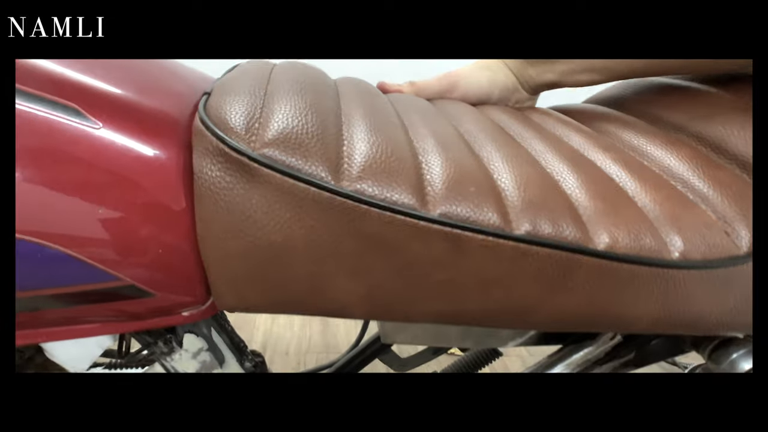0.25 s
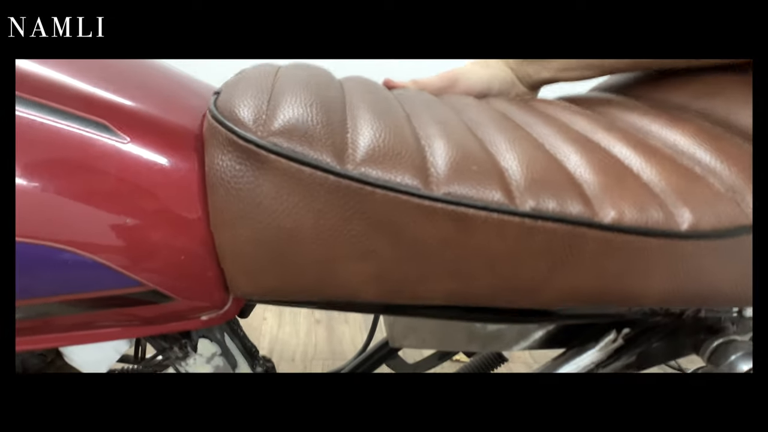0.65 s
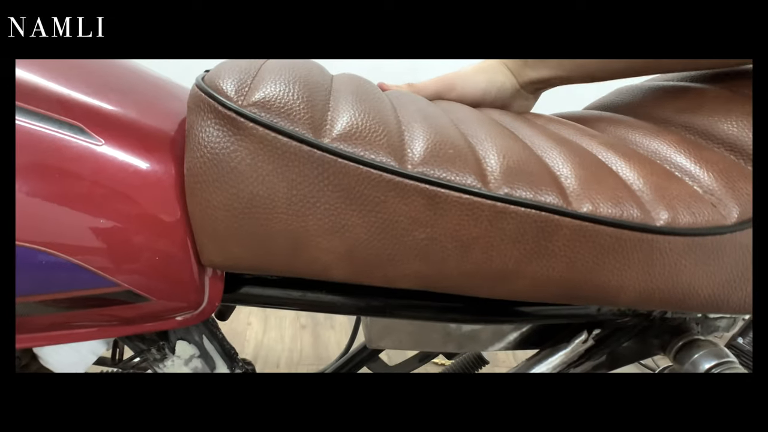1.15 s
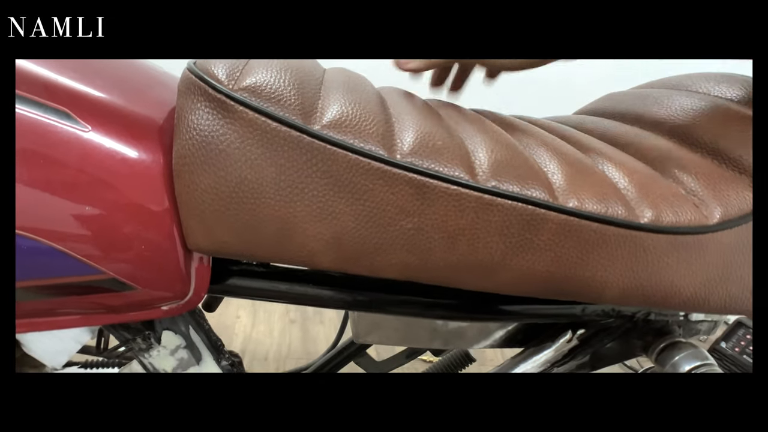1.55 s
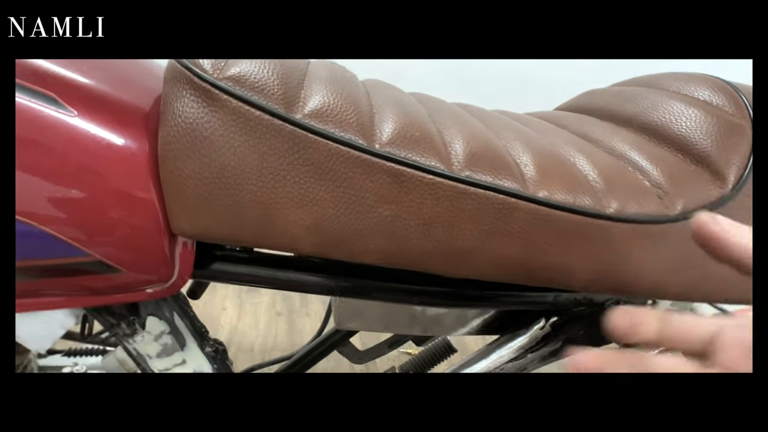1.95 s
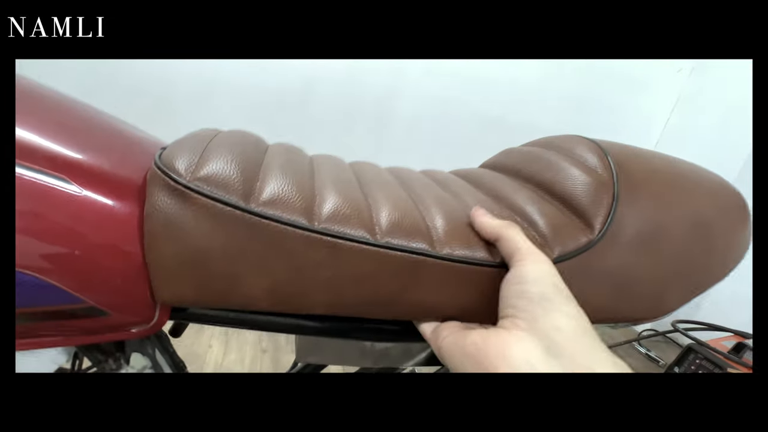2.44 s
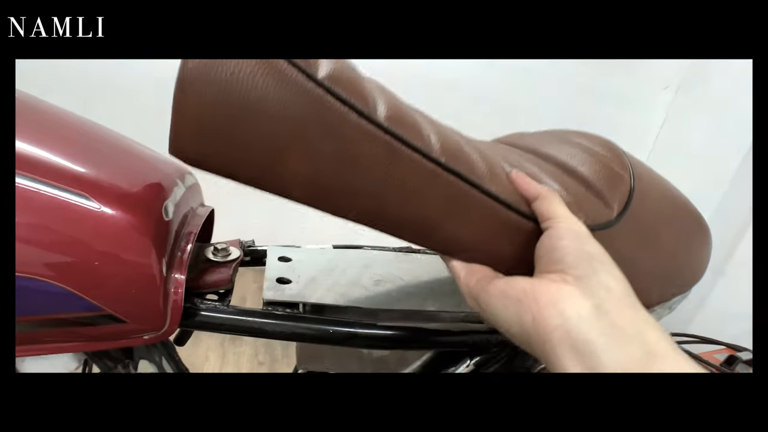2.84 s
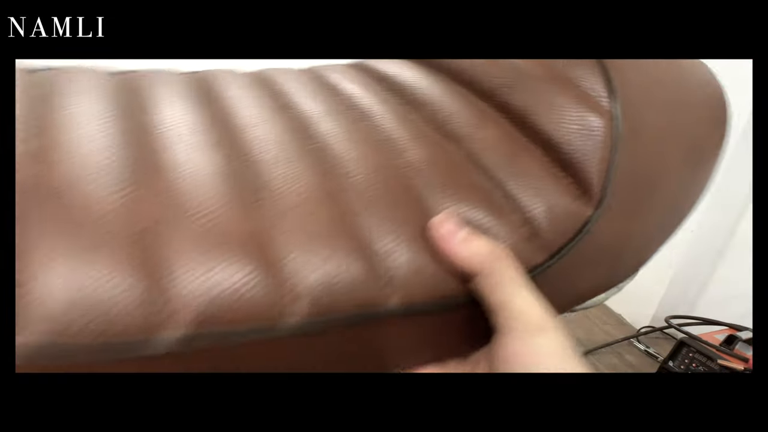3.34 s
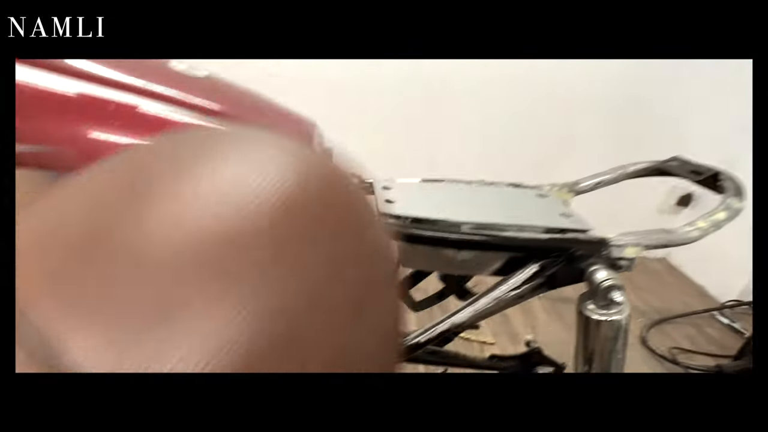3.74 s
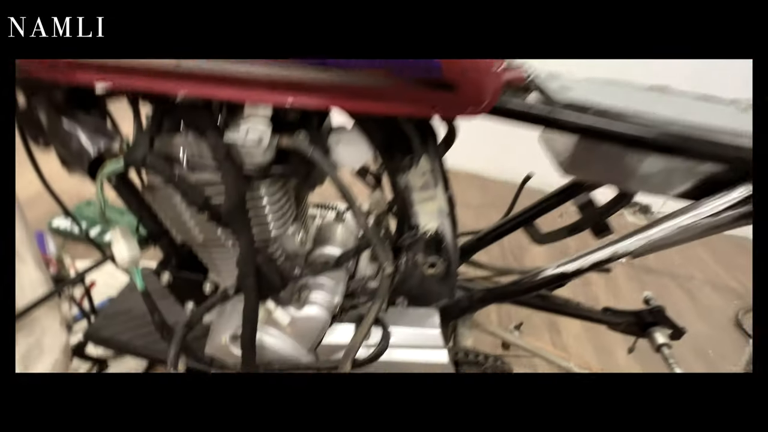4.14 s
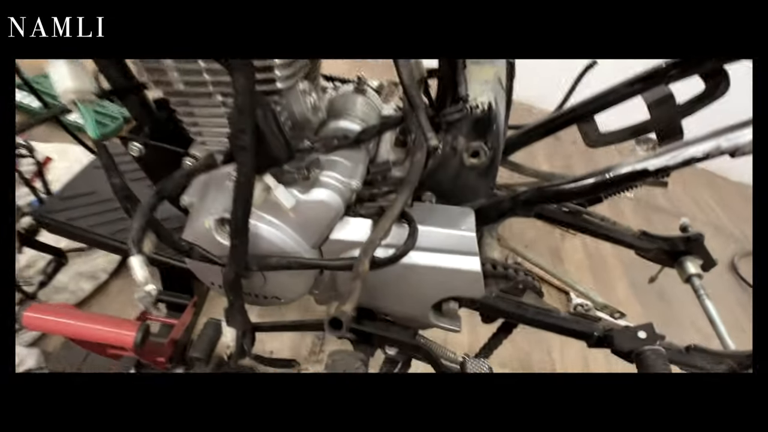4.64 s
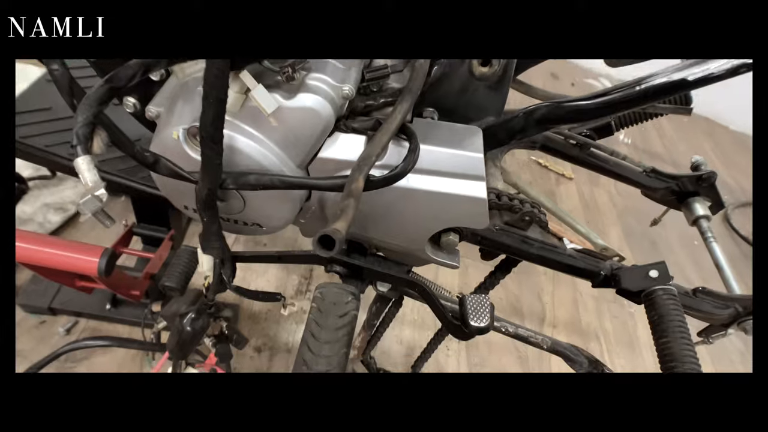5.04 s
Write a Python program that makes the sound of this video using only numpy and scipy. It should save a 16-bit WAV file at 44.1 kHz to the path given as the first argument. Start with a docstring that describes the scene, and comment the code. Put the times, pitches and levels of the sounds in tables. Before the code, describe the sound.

A motorcycle seat is handled close to a small, slightly coloured microphone in a bare, reverberant workshop. From about 0.15 s it is rocked: low hollow thuds of the seat pan, a heavy one near 0.38 s, then a crowded rattle of plastic clacks and metal knocks from 0.6 to 0.8 s, with scraping and short squeaks. Single knocks follow near 0.92, 0.98 and 1.26 s, their echoes fading. It stays quiet until about 2 s, when light touches and rubbing begin, building to knocks and tiny creaks at 2.4 and 2.6 s and a sharp, loud clack at 2.67 s as the seat comes free. The echo dies into room air, fluctuating low rumble and faint rubbing around 3.2-3.6 s. A distant motor hum grows slightly clearer after 4 s. From 4.77 s tools tick and clunk, with a small faint creak, then a duller clatter at 5.08-5.2 s.

```python
"""A padded motorcycle seat, close to the microphone, is rocked, unhooked and lifted off its steel frame.
Bursts of contact ring the seat pan, shell, brackets and steel as thuds, knocks and ticks; tools clatter
at the end. Random slips through the same parts scrape, and narrow resonances squeak. Sparse echoes fill
the bare workshop; a distant motor hums as sines over noise, the air of the room, and a low rumble.
A small microphone colours it all and overloads softly on the hardest peaks."""
import sys
import numpy as np
from scipy import signal
from scipy.io import wavfile
from scipy.ndimage import uniform_filter1d

SR = 44100
rng = np.random.default_rng(int(sys.argv[2]) if len(sys.argv) > 2 else 0)


def generate_wav(signal):
    """Clip the signal to [-1, 1] and save it as 16-bit WAV at the path in sys.argv[1]."""
    frames = np.transpose(np.atleast_2d(signal))
    scaled = np.clip(frames, -1, 1) * 32767
    pcm = np.round(scaled).astype(np.int16)
    wavfile.write(sys.argv[1], SR, pcm)


N = 233244

# ringing modes of each part: (frequency [Hz], relative level [dB], t60 [s])
PAN_MODES = [(115, -7.5, 0.051), (194, -4.5, 0.036), (257.2, -0.5, 0.093), (293, 3, 0.042),
             (403, -0.5, 0.042), (497, -2.5, 0.053), (608.4, -2, 0.039)]
SHELL_MODES = [(702, -16, 0.035), (921, 4, 0.012), (964, 5, 0.011), (1390, 3, 0.0043)]
BRACKET_MODES = [(1642, 7.5, 0.019), (1940, 10.5, 0.0072), (2245, 9, 0.013), (2575, 5.5, 0.011),
                 (2850, 4, 0.016), (3136, 10.5, 0.0054)]
STEEL_MODES = [(3783, 14, 0.0065), (4410, 9.5, 0.005), (4995, 5.5, 0.011), (5434, 1.5, 0.017),
               (5850, 6.5, 0.0086), (6340, 4, 0.012), (6834, 0, 0.023), (7380, 3, 0.013)]
TICK_MODES = [(7900, 0, .004), (8800, 0, .004), (9700, -1, .004), (10600, -2, .004), (11600, -3, .0035),
              (12700, -5, .003), (13900, -7, .003), (15100, -9, .003)]
BODIES = (PAN_MODES, SHELL_MODES, BRACKET_MODES, STEEL_MODES, TICK_MODES)
# pitch of shell, bracket, steel and tick against the bracket: (pitch [octaves])
OCTAVES = np.array([-1.2, 0, 1.25, 2.2])


def amp(db):
    """Decibels to gain."""
    return 10 ** (np.asarray(db) / 20)


def evened(x):
    """Scaled to rms 1."""
    return x / np.sqrt(np.mean(x ** 2) + 1e-20)


def read(points, hz):
    """Table value at a frequency, straight lines on a log axis."""
    f, value = np.transpose(points)
    return np.interp(np.log(hz + 1), np.log(f + 1), value)


def add(mix, s, sound):
    """Mixes a sound in at a time in seconds."""
    part = mix[round(s * SR):][:len(sound)]
    part += sound[:len(part)]


def air():
    """Room air: steady coloured noise with faint drifting patches in time and frequency."""
    # colour of the air: (frequency [Hz], relative density [dB per Hz])
    air_colour = [(30, -43.5), (60, -5), (160, -5), (400, -8.5), (1000, -12.5), (2500, -17), (5000, -30),
                  (8000, -35), (9200, -43.5), (10100, -36), (11000, -45.5), (13000, -48), (16000, -55.5)]
    level_db = -40  # rms ahead of the microphone
    frames, hz = N // 256 + 5, np.fft.rfftfreq(1024, 1 / SR)
    real, imag, patches = rng.standard_normal((frames, 513, 3)).T
    patches = uniform_filter1d(patches, size=10, axis=0)
    patches = evened(uniform_filter1d(patches, size=16, axis=1))
    spectrum = (real + 1j * imag) * amp(read(air_colour, hz)[:, None] + 0.64 * patches)
    noise = signal.istft(spectrum, nperseg=1024, noverlap=768)[1][:N]
    return amp(level_db) * evened(noise)


def wander(t, low_hz, high_hz, count):
    """Slow irregular movement of rms 1: a sum of sines with random phases."""
    rates = np.geomspace(low_hz, high_hz, num=count)
    return evened(sum(np.sin(2 * np.pi * (f * t + rng.random())) for f in rates))


def low_rumble():
    """Low rumble near 75 Hz, swelling at random: a sine wandering in pitch and strength."""
    # level of the rumble: (time [s], level [dB])
    rumble_level = [(0.0, -42), (0.35, -57), (0.43, -38), (0.5, -45), (0.53, -50), (0.97, -40), (1.05, -57),
                    (1.75, -40), (1.91, -52), (2.65, -41.5), (2.99, -57), (3.67, -41), (3.7, -50.5),
                    (4.3, -47), (4.45, -63), (4.52, -38), (4.62, -51.5), (5.29, -46.5)]
    centre_hz, drift_hz, swell_db = 75.4, 3.38, 1.5  # drift and swell are rms
    t = np.arange(N) / SR
    drift = wander(t, 0.5, 5, 12)
    swell = wander(t, 2.5, 7.7, 12)
    phase = 2 * np.pi * np.cumsum(centre_hz + drift_hz * drift) / SR
    rumble = evened(amp(swell_db * swell) * np.sin(phase))
    return amp(np.interp(t, *np.transpose(rumble_level))) * rumble


def hum():
    """Distant motor: each order is a sine that wavers slightly in strength."""
    # motor orders ahead of waver and swell: (frequency [Hz], rms level [dB])
    orders = [(145, -57.5), (161.5, -55.5), (323, -48.5), (565.2, -59.5)]
    # the motor is heard more or less as the microphone turns: (time [s], gain [dB])
    swell = [(0, 10), (1, -2), (2, -1.5), (3, -1.5), (3.7, -1), (4.1, 6.5), (4.5, 5.5), (4.8, 7),
             (5.29, 5.5)]
    t = np.arange(N) / SR
    motor = 0
    for hz, db in orders:
        gain = np.sqrt(2) * amp(db + wander(t, 1.5, 6, 6))
        motor = motor + gain * np.sin(2 * np.pi * (hz * t + rng.random()))
    return motor * amp(np.interp(t, *np.transpose(swell)))


def room(x):
    """Workshop walls: sparse echoes of random sign, each band dying at its own speed."""
    # decay of the room: (frequency [Hz], t60 [s])
    decay_times = [(120, 0.44), (330, 1.4), (870, 1.1), (2300, 0.98), (6000, 0.87), (10000, 0.59),
                   (15000, 0.29)]
    # strength of the echoes: (frequency [Hz], level [dB])
    echo_strength = [(120, -7.5), (400, -5.5), (1200, -2), (5000, -4), (10000, -1.5), (15000, 0)]
    spacing = 12  # samples; one echo falls at random in each slot
    taps = np.zeros(SR + SR // 2)
    at = np.arange(200, len(taps) - spacing, spacing)
    taps[at + rng.integers(0, spacing, len(at))] = rng.choice([-1., 1.], len(at))
    hz, t, bands = signal.stft(taps, SR, nperseg=256)
    decay = amp(-60 * t / read(decay_times, hz)[:, None])
    # equal energy in every band, then the echo strength
    decay *= amp(read(echo_strength, hz))[:, None] / np.linalg.norm(decay, axis=1, keepdims=True)
    tail = signal.istft(bands * decay, SR, nperseg=256)[1] * np.sqrt(spacing / 128)
    return signal.fftconvolve(x, tail)[:N]


def squeak(hz, width, db, length):
    """Rubbed part: a steady tone joined by noise held in one narrow resonance."""
    t = np.arange(0, length, 1 / SR)
    pole = np.exp(-np.pi * width / SR)
    # 12000 samples let the resonance settle; only the end is used
    drift = signal.lfilter([1], [1, -pole], rng.standard_normal((2, 12000)))[:, -len(t):]
    envelope = 1.5 * drift.std() + drift[0] + 1j * drift[1]
    tone = (envelope * np.exp(2j * np.pi * hz * t)).real
    attack = np.minimum(t / .004, 1)
    release = np.minimum((length - t) / (.6 * length), 1)
    return amp(db) * evened(tone) * attack * release


def ring(modes, spread_db, detune):
    """One tap on a body; where it lands shifts the strength and pitch of each mode."""
    hz, db, t60 = np.transpose(modes)[:, :, None]
    place = rng.standard_normal((2, len(modes), 1))
    t = np.arange(6000) / SR
    sign = (-1) ** np.arange(len(modes))[:, None]  # neighbouring modes swing in opposite senses
    waves = sign * np.sin(2 * np.pi * hz * (1 + detune * place[0]) * t)
    return (amp(db + spread_db * place[1] - 60 * t / t60) * waves).sum(0)


def slide(rows):
    """Stick-slip: dense grains of uneven size run through the parts; returns start time and sound."""
    # how readily shell, bracket, steel and tick answer rubbing: (gain [dB])
    rub_db = np.array([-2.0, 1.5, -1.5, -6.5])
    slip_rate = 2500  # mean slips per second
    s, rumble_db, pressure_db, sharpness = np.transpose(rows)
    levels_db = [rumble_db, *(pressure_db + rub_db[:, None] + sharpness * OCTAVES[:, None])]
    t = np.arange(s[0], s[-1], 1 / SR)
    out = 0
    for modes, db in zip(BODIES, levels_db):
        size = amp(3.5 * np.minimum(rng.exponential(1, len(t)), 4))
        slips = size * (rng.random(len(t)) < slip_rate / SR)
        slips *= rng.choice([-1., 1.], len(t))
        scrape = signal.fftconvolve(slips, ring(modes, 0, 0))[:len(t)]
        out = out + amp(np.interp(t, s, db)) * evened(scrape)
    return s[0], out * signal.windows.tukey(len(t), .02)


def blow(thud_db, clack_db, knock_db, sharpness, length):
    """Contacts build up to a hard one and chatter away; returns the near sound and what fills the room."""
    # how readily bracket, steel and tick answer a knock: (gain [dB])
    knock_answer_db = np.array([.3, .7, -1.5])
    hard_edge = 3.27  # main contact, against a chatter of 0.49
    t = np.arange(4000) / SR
    rise = np.clip(length ** 2 / 0.016, .0001, .03)  # [s] long chatters build up slowly
    # sharp contact favours the high parts
    levels_db = [thud_db, clack_db, *(knock_db + knock_answer_db + sharpness * OCTAVES[1:])]
    uneven = evened(uniform_filter1d(rng.standard_normal(4000), size=40))
    contacts = 0.49 * rng.standard_normal(4000) * amp(2.0 * uneven)
    contacts *= np.minimum(t / rise, 1) ** 2 * np.exp(-np.maximum(t - rise, 0) / max(length, .0003))
    contacts[round(rise * SR)] = hard_edge * np.exp(-rise / 0.0009)  # a slow build-up softens the edge
    near = spread = 0
    for body, db in zip(BODIES, levels_db):
        sound = signal.fftconvolve(contacts, ring(body, 1.0, .01))
        loudest = np.sqrt(uniform_filter1d(sound ** 2, size=256).max())  # short-time rms
        sound = amp(db) * sound / loudest
        even = ring(body, 0, 0)  # summed over all directions the colour is smooth
        near = near + sound
        spread = spread + even * np.linalg.norm(sound) / np.linalg.norm(even)
    return near, spread


def scene():
    """Blows, slides and squeaks with their echoes, over air, low rumble and hum."""
    # blows: (time [s], seat pan thud [dB], plastic shell clack [dB], metal knock [dB],
    #         sharpness [dB per octave], chatter length [s])
    blows = [(0.153, -22, -33, -39, -0.5, 0.0031), (0.161, -20, -31, -36, -4.5, 0.01),
             (0.178, -26, -27.5, -38, -1.5, 0.0046), (0.19, -16, -22.5, -35, -5, 0.0066),
             (0.331, -31, -50, -50, 8, 0.0023), (0.363, -18.5, -21.5, -50, -16, 0.012),
             (0.376, -8.5, -22, -28.5, -18, 0.0044), (.394, -13.5, -18.5, -34, -2, 0.0053),
             (0.41, -19, -42, -27.5, -4.5, 0.0059), (0.479, -35, -45, -48, 3, 0.0021),
             (.586, -30, -34, -28.5, -1, 0.0033), (0.591, -35.5, -38, -30, -1.5, 0.0054),
             (0.599, -14, -24, -27.5, 1, 0.014), (.615, -14.5, -14.5, -27, -3.5, 0.011),
             (0.628, -18, -21, -20, -3, 0.0082), (.649, -33, -19, -20, -7, .004),
             (0.679, -18, -25, -23.5, -1, 0.0059), (0.708, -10, -15.5, -21, -4.5, 0.0031),
             (0.724, -39.5, -19.5, -27, -5.5, .008), (0.735, -11, -18, -11, 2, .0047),
             (0.744, -17, -21.5, -18, 4, .007), (0.753, -25, -19, -10, 0.4, .008),
             (0.77, -45, -30, -20, -2, .007), (0.781, -24, -28.5, -37, -1, .009),
             (.924, -21.5, -18, -20, -2, 0.0036), (.984, -27, -20.5, -20, -3, 0.0032),
             (1.2557, -26, -19, -19.5, -1, 0.0027), (1.259, -18.5, -27, -23, -2, .0037),
             (1.294, -32.5, -25.5, -30, -6, 0.0046), (1.691, -37.5, -40, -55.5, 5, 0.0049),
             (2.004, -40, -47.5, -26, -14, 0.0055), (2.085, -40, -55, -43, -1, 0.014),
             (2.2193, -26, -17, -26, -0.5, .0021), (2.239, -32, -38, -29.5, -2, .008),
             (2.313, -25, -33, -26.5, -2.5, 0.0037), (2.383, -47, -19, -32, -9, .0018),
             (2.399, -30, -29, -22.5, -5.5, 0.0074), (2.42, -30, -37, -30, -6, .008),
             (2.426, -17.5, -24.5, -20.5, -5, 0.0057), (2.516, -33, -51, -31, -2.5, 0.0032),
             (2.594, -16, -61, -30, -2.5, 0.0058), (2.599, -24.5, -31, -33, -8, .011),
             (2.615, -24, -26, -26, -1, .0098), (2.6744, -15.5, -10, -9.5, 0, 0.0023),
             (4.7672, -53, -46, -27, -6.5, 0.0012), (4.818, -21, -29, -31, 1.5, 0.0042),
             (5.036, -48, -53, -46, 7, 0.0046), (5.084, -53, -25.5, -28.5, -11, 0.0049),
             (5.091, -47, -22, -28, -15, 0.0052), (5.156, -21, -18.5, -20.5, -8.5, 0.0091),
             (5.18, -38, -21, -22, -23, 0.0082)]
    # sliding contact, one table a stroke; the first opens on the dying ring of an earlier knock:
    # (time [s], pan rumble [dB], pressure on the hard parts [dB], sharpness [dB per octave])
    strokes = [
        [(0.0, -27, -35.5, -2.5), (.256, -47.5, -57, -9), (.44, -23, -44, -3), (.56, -52, -59, -6),
         (.6, -20.5, -27.5, -4), (.658, -24, -36.5, -3.5), (.768, -35, -19, 5), (.818, -24, -42.5, -17),
         (.88, -29.5, -29, 3.7), (.984, -29.5, -34.5, -2), (1.05, -37, -40, 1)],
        [(1.7, -71, -73, 6), (1.978, -55, -51, -5), (2.02, -45, -42, -2), (2.11, -47.5, -46.5, -2),
         (2.196, -50, -49, -3), (2.284, -38.5, -42, -0.5), (2.4, -31.5, -37, -1.5), (2.46, -27.5, -30.5, -1.5),
         (2.56, -38, -44.5, -2), (2.624, -39.5, -35.5, 1), (2.68, -37, -28, 0.5)],
        [(3.2, -68, -53.5, -5), (3.41, -59.5, -55.5, 1.3), (3.65, -50.5, -57.5, -4)],
        [(4.82, -25, -35.5, -2.5), (4.964, -52, -56, -11), (5.038, -45, -47, 2), (5.142, -31.5, -34.5, -5.5),
         (5.248, -34, -38, -7.5), (5.289, -20, -37, -11)],
    ]
    # squeaks and rings of rubbed parts:
    # (time [s], frequency [Hz], width [Hz], level [dB], length [s])
    squeaks = [(0.19, 289.5, 17, -29, 0.14), (0.659, 714, 25, -22, 0.039), (.745, 1577, 52, -18.5, 0.042),
               (2.399, 2490, 120, -29, 0.056), (2.398, 248, 40, -24.5, 0.07), (2.592, 251.6, 34, -22, 0.06),
               (2.4, 4850, 82, -30.5, 0.055), (2.41, 8100, 200, -38, 0.022), (4.83, 416, 15, -39, 0.24),
               (4.868, 298, 18, -36, 0.15), (5.165, 806, 88, -23.5, 0.12)]
    near, spread = np.zeros(N), np.zeros(N)
    for s, *strength, length in blows:
        sound, even = blow(*strength, length)
        add(near, s, sound)
        add(spread, s + length, even)
    for s, sound in map(slide, strokes):
        add(near, s, sound)
        add(spread, s, sound)
    for s, *rest in squeaks:
        sound = squeak(*rest)
        add(near, s, sound)
        add(spread, s, amp(-1.5) * sound)  # squeaks face the microphone more than the walls
    return (near + room(spread) + air() + low_rumble() + hum())[None]


def record(dry):
    """Microphone colour with a notch from its port, soft overload, band limit."""
    # response of the microphone: (frequency [Hz], gain [dB])
    mic_response = [(30, -15), (50, -5.5), (75, 1), (120, 1), (300, -3), (2200, -3), (2900, 4.5),
                    (3250, -8.5), (3600, -13.5), (4200, -0.5), (5200, 5), (7600, 0), (8600, 0.5),
                    (10000, -1), (11500, -2.5), (16000, -8.5)]
    ceiling, edge_hz = 1.0, 15633  # overload level [full scale], upper band edge
    colour = np.fft.irfft(amp(read(mic_response, np.fft.rfftfreq(4096, 1 / SR))))
    colour = np.roll(colour, 2048) * np.hanning(4096)
    coloured = signal.oaconvolve(dry, colour[None], "same")
    clipped = coloured / (1 + abs(coloured / ceiling) ** 10) ** (1 / 10)
    band = signal.firwin(1023, edge_hz, window=("kaiser", 7), fs=SR)
    return signal.oaconvolve(clipped, band[None], "same")


dry = scene()
out = record(dry)
generate_wav(out)
```